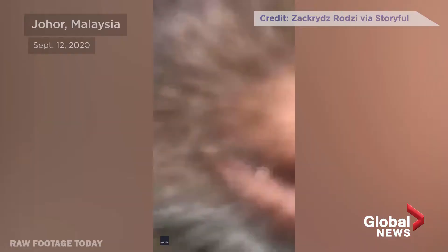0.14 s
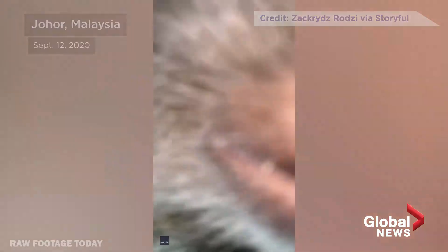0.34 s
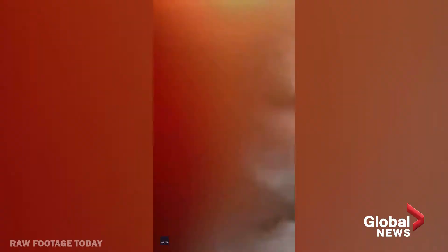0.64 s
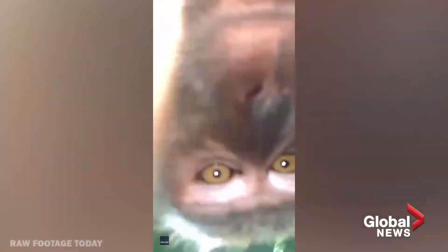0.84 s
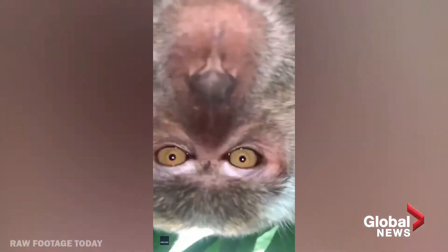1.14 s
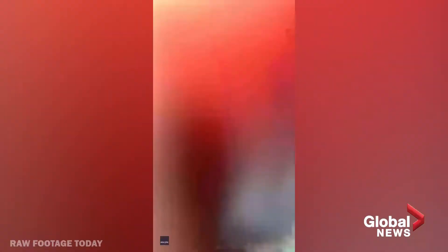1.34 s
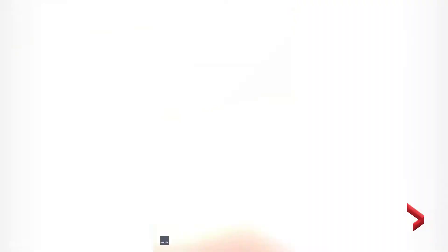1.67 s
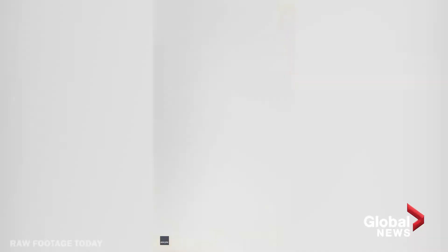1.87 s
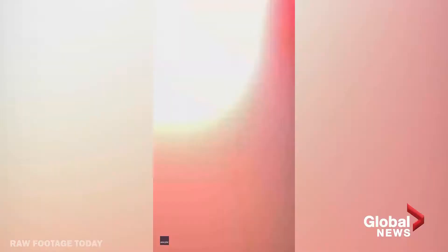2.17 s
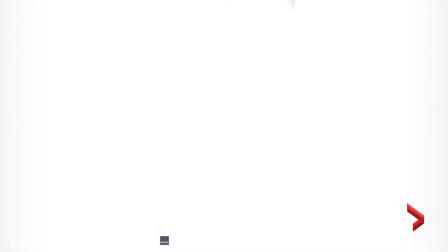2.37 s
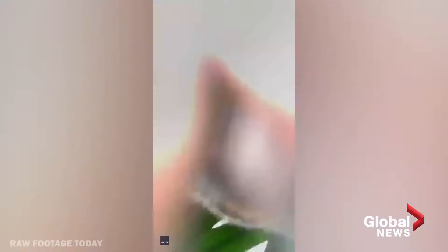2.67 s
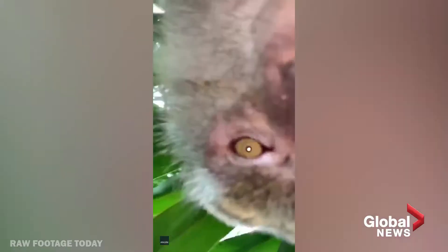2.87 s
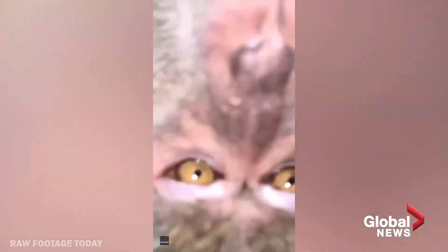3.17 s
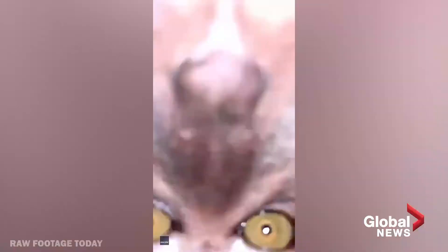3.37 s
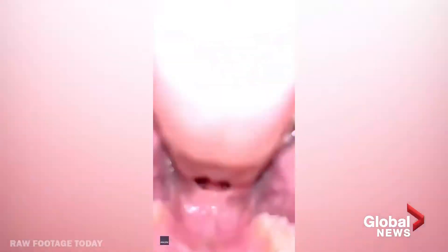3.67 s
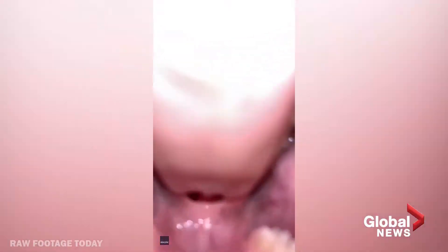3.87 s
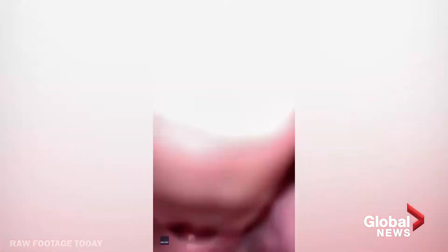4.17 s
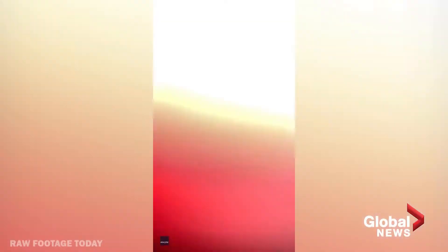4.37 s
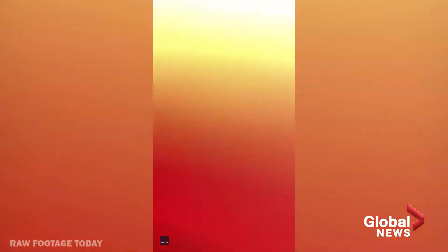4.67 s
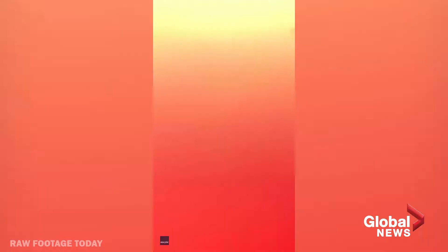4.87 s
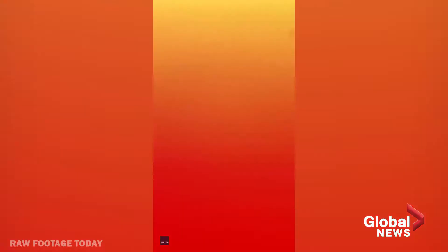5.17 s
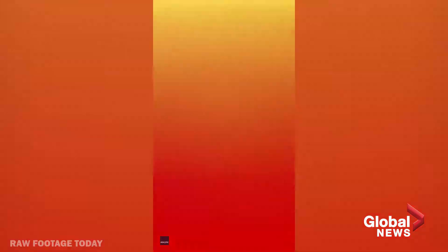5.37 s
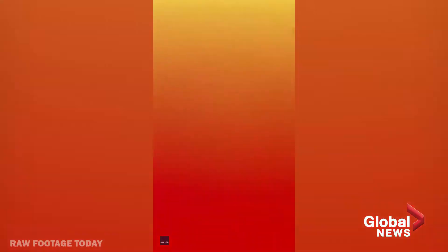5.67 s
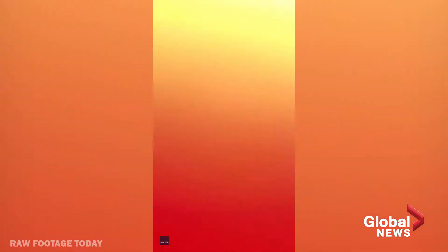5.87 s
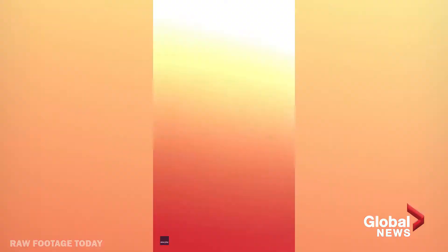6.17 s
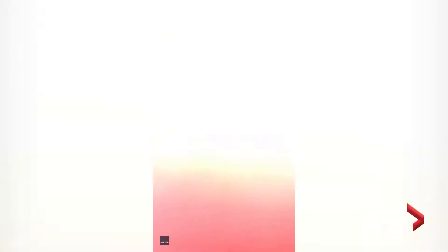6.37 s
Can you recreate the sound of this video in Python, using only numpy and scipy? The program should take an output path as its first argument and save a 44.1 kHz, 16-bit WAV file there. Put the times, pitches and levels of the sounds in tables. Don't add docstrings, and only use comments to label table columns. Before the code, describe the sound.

A monkey holds a phone outdoors, its microphones touched directly. A faint dove coos, then dull knocks near the start, a busy spell of thumps, fur rubbing and small squeaks, a quieter stretch with light tooth ticks, then sharp clicks and very loud booming bites, ending in sparse tiny wet ticks. Distant traffic and leaf hiss lie underneath.

```python
import sys
import numpy as np
from scipy import signal
from scipy.fft import rfft, irfft, next_fast_len
from scipy.io import wavfile
from scipy.ndimage import uniform_filter1d

SR = 44100
rng = np.random.default_rng(int(sys.argv[2]) if len(sys.argv) > 2 else 0)


def to_wav(sig):
    pcm = np.clip(np.atleast_2d(sig), -1, 1) * 32767
    pcm = np.round(pcm).astype(np.int16)
    wavfile.write(sys.argv[1], SR, pcm.T)


def level_to_linear(level):
    exponent = np.asarray(level, float) / 20
    return 10 ** exponent


N = 287393
SIZE = next_fast_len(N + SR // 2)
HZ = np.maximum(np.arange(SIZE // 2 + 1) * SR / SIZE, 1)
TIME = np.arange(N) / SR

# (frequency [Hz], level [dB per Hz])
CRACK_COLOUR = [(2200, -8.5), (3000, 15.5), (5000, 12.5), (9000, -29.5), (12000, -53), (12800, -39)]


def at_hz(points, hz=HZ):
    table_hz, values = np.array(points)[:, 0], np.array(points)[:, 1]
    return np.interp(np.log(hz), np.log(np.maximum(table_hz, 1)), values)


def in_time(rows):
    s, *columns = np.transpose(rows)
    return np.array([np.interp(TIME, s, c) for c in columns])


def drift(rate):
    r = np.exp(-80 * np.pi * rate / SR)
    white = rng.standard_normal(N // 40 + 2002)
    slow = signal.lfilter([1], [1, -2 * r, r * r], white)[2000:]
    return np.interp(np.arange(N) / 40, np.arange(len(slow)), slow / slow.std())


def noise(colour, patchy_db, patch_rate, grain_db, count):
    grains = rng.standard_normal((2, N)) * level_to_linear(grain_db * drift(800))
    spectrum = rfft(grains, SIZE) * level_to_linear(at_hz(colour))
    low_hz, high_hz = colour[0][0], colour[-1][0]
    place = (np.log(HZ / low_hz) / np.log(high_hz / low_hz)).clip(0, 1) * (count - 1)
    out = 0
    for k in range(count):
        crossfade = np.cos(np.pi / 2 * np.clip(place - k, -1, 1))
        band = irfft(spectrum * crossfade, SIZE)[:, :N]
        out = out + band * level_to_linear(patchy_db * drift(patch_rate))
    return out / out[0].std()


def blows(seconds, peak_db, colour, early_s=0.):
    # (frequency [Hz], delay [ms])
    low_lag = [(40, 39.2), (70, 29.5), (120, 16), (300, 7.5), (500, 5.5), (900, 4), (1500, 2.1),
               (3000, 0.92)]
    skirt_db_per_octave = 60
    cycles = np.cumsum(at_hz(low_lag) / 1000 - early_s) * SR / SIZE
    octaves_outside = np.abs(np.log2(HZ / HZ.clip(colour[0][0], colour[-1][0])))
    shape = level_to_linear(at_hz(colour) - skirt_db_per_octave * octaves_outside) * np.exp(-2j * np.pi * cycles)
    clicks = np.zeros(N)
    clicks[np.round(np.array(seconds) * SR).astype(int)] = level_to_linear(np.array(peak_db))
    return irfft(rfft(clicks, SIZE) * shape, SIZE)[:N] / np.abs(irfft(shape, SIZE)).max()


def garden():
    # (time [s], exposure of the ports [dB], fur brushing nearby [dB])
    hold = [(0, -53.5, -88), (.56, -51, -78), (.7, -51, -78), (1.05, -52, -76), (1.3, -52, -79.5),
            (1.62, -55.5, -66), (2.1, -50.5, -68), (2.65, -54.5, -76), (3.2, -54.5, -85.5),
            (3.7, -52, -73.5), (4.25, -53, -76), (4.57, -48.5, -64), (4.75, -56.5, -64.5),
            (5.25, -51.5, -67), (5.8, -54.5, -79.5), (6.2, -59.5, -80.5), (6.52, -57.5, -79.5)]
    # (time [s], level [dB])
    traffic = [(0, -47), (.8, -46.5), (1.3, -48.5), (1.7, -53.5), (2.3, -52), (2.9, -52.5), (3.4, -52),
               (3.7, -50), (5, -53.5), (5.75, -52), (6.1, -56), (6.52, -52)]
    # (from [s], to [s], treble [dB])
    background_dip = (5.265, 5.55, -21)
    # (frequency [Hz], level [dB per Hz])
    rumble_colour = [(25, -20), (45, -2), (70, -0.5), (150, -3), (260, -10), (330, -85)]
    rustle_colour = [(200, -34), (280, 4.5), (500, -1.5), (900, -4.5), (1300, -13.5), (2000, -13),
                     (2700, -14), (3200, -62)]
    insect_colour = [(2300, -16), (2900, 1), (3600, 3.5), (4500, -3), (6200, -8), (7500, 4), (8200, 4),
                     (8800, -32.5)]
    hiss_colour = [(7600, -45.5), (8400, -1.5), (9300, -5), (11000, -7.5), (11900, 2.5), (12400, -37.5)]
    rustle_db, hiss_db = -2.5, 3
    insects_db, insects_follow = -60.5, 0.31

    exposure_db, brushing_db = in_time(hold)
    start, end, dip_db = background_dip
    dip_db = dip_db * np.clip(np.minimum(TIME - start, end - TIME) / 0.016 + 1, 0, 1)
    rumble = level_to_linear(in_time(traffic)[0]) * noise(rumble_colour, 3.5, 8.6, 0, count=4)
    insect_gain = level_to_linear(insects_db + insects_follow * (brushing_db - brushing_db.mean()) + dip_db)
    rustle_gain = level_to_linear(exposure_db + rustle_db + 0.45 * dip_db)
    hiss_gain = level_to_linear(brushing_db + hiss_db + dip_db) + whiskers()
    rustle = rustle_gain * noise(rustle_colour, 0.53, 2.4, 3.3, count=6)
    insects = insect_gain * noise(insect_colour, 4.6, 3.7, 0.33, count=10)
    hiss = hiss_gain * noise(hiss_colour, 4.5, 7.0, 1.1, count=4)
    return rumble + rustle + insects + hiss


def dove():
    # (hoot start [s], hoot stretch [factor], roll start [s])
    calls = [
        (.18, 1.001, .591),
        (4.22, 1.07, 4.632),
    ]
    # (time from start [s], pitch [Hz], level [dB])
    hoot_track = [(0, 584, -54.5), (0.038, 634, -44.5), (0.05, 727, -46), (.064, 734, -44),
                  (.09, 731, -56.5), (0.168, 710, -40), (.2, 725, -55), (.27, 725, -56), (0.29, 715, -66)]
    # (time from first throb [s], pitch [Hz], held tone [dB], throb [dB])
    roll_track = [(-.03, 612, -93, -35.5), (0.021, 680, -59, -42), (.11, 707.8, -59.5, -44),
                  (0.257, 668, -58.5, -39), (0.39, 605, -52, -49.5), (.46, 569, -51.5, -88),
                  (0.551, 521, -60.5, -60)]
    throb_times = [0, .039, .071, .103, .131, .159, .188, .216, .242, .267, .291, .314, .338, .361, .38]
    throb_s, throb_rise_hz, throb_spread_db = 0.02, 32, 2

    out = np.zeros(N)
    for hoot_s, stretch, roll_s in calls:
        s = roll_s + np.array(throb_times)
        nearest = np.abs(TIME[::32, None] - s).argmin(axis=1).repeat(32)[:N]
        place = np.clip((TIME - s[nearest]) / throb_s, -.5, .5)
        throb_gain = level_to_linear(throb_spread_db * rng.standard_normal(len(s))[nearest])
        throb = throb_gain * np.cos(np.pi * place) ** 2
        slide_hz = throb_rise_hz * np.sin(2 * np.pi * place)
        hoot = [(hoot_s + stretch * t, hz, db, -120) for t, hz, db in hoot_track]
        roll = [(roll_s + t, *rest) for t, *rest in roll_track]
        for rows in hoot, roll:
            sounding = (TIME > rows[0][0]) & (TIME < rows[-1][0])
            flutter_db = 2.2 * drift(28)
            pitch_hz, held_db, throb_db = in_time(rows)
            phase = 2 * np.pi * np.cumsum(pitch_hz + slide_hz + 4.0 * drift(26)) / SR
            level = np.sqrt(2) * level_to_linear(held_db + flutter_db) + level_to_linear(throb_db) * throb
            out += sounding * level * np.sin(phase)
    return out


def knocks():
    # (time [s], peak [dB], low push, edge, crack [dB above peak])
    case_blows = [(0.6264, -9, -25, -42, -18.5), (0.995, -11.5, -6.5, -72, -31),
                  (1.022, -15.5, -10.5, -51, -47), (1.453, -13, 10.5, -29, -18),
                  (1.468, -7.5, 0, -4.5, -13), (1.736, -19, 1.5, -20, -21), (1.984, -30, -18, -35, -23),
                  (2.284, -17.5, 5.5, 9, -2), (2.343, -30.5, -10, -27, -42), (3.731, -30, 4, 8.5, -44),
                  (4.862, -32.5, -38, -33, -14.5), (5.208, -1, 1.5, -14, -40.5),
                  (5.2135, -8, -12.5, -12, -30), (5.219, -8.5, -3.5, -16, -39.5),
                  (5.233, -11, -3, -13.5, -41), (5.226, -4, 7, -25.5, -33), (5.246, -11.5, 9, -26, -26.5),
                  (5.436, -1, 5.5, -24, -75), (5.455, 4, 1.5, -14.5, -56), (5.475, -22, 17, -33, -30.5),
                  (5.482, -18, -4, -4, -19.5), (5.611, -5, -4.5, -11, -16), (5.625, -21.5, -4, -5.5, -11),
                  (5.655, -30.5, 3, -3.5, -22)]
    # (time [s], peak [dB])
    grip_pushes = [(0.327, -70), (1.577, -36), (1.737, -10), (1.766, -11.5), (1.998, -27.5), (2.119, -18),
                   (2.14, -18), (2.172, -24.5), (2.566, -26.5), (2.598, -26.5), (3.02, -50.5), (5.262, -2),
                   (5.285, -14), (5.387, -26), (5.502, -16.5)]
    # (frequency [Hz], level [dB per Hz])
    push_colour = [(25, -33.5), (55, -14), (100, -6), (200, -11), (320, -16.5), (450, -22)]
    grip_colour = [(30, -22), (50, -6), (75, 4), (120, 1.5), (190, -14), (280, -29.5)]
    case_colour = [(200, -36.5), (320, -6), (600, 4.5), (950, 3.5), (1300, -11.5), (1600, -74)]
    edge_colour = [(1100, -9.5), (1400, -6.5), (2000, -6), (2450, -25), (3200, -40), (5000, -52)]

    s, peak_db, push_db, edge_db, crack_db = np.transpose(case_blows)
    grip_s, grip_db = np.transpose(grip_pushes)
    s = s - .0012
    push = blows(s, peak_db + push_db - 7.0, push_colour)
    case = blows(s, peak_db - 6.5, case_colour)
    edge = blows(s, peak_db + edge_db + 4.0, edge_colour)
    crack = blows(s, peak_db + crack_db + 5.5, CRACK_COLOUR)
    return push + case + edge + crack + blows(grip_s, grip_db - 4.0, grip_colour, early_s=0.013)


def far_notes(wobble=0.018):
    # (start [s], length [s], pitch [Hz], level [dB])
    far_calls = [
        (0.848, 0.3, 5460, -59),
        (1.236, 0.15, 5870, -63),
        (1.398, 0.12, 649, -44),
        (3.22, 0.074, 5300, -59),
        (3.287, 0.12, 8300, -61.5),
        (3.294, 0.9, 462, -58.5),
        (3.82, 0.13, 8455, -56.5),
        (3.911, 0.027, 620, -44.5),
        (4.73, 0.12, 5840, -56),
    ]
    # (start [s],
    # length [s], pitch [Hz], level [dB])
    squeaks = [(.79, 0.026, 840, -50.5), (1.738, 0.035, 760, -31.5), (1.862, 0.017, 700, -40),
               (1.7, 0.013, 880, -38), (2.6, 0.021, 826, -40.5), (1.958, 0.011, 1080, -32.5),
               (1.985, .03, 757, -39), (2.136, 0.017, 700, -32), (2.405, 0.036, 977, -48.5),
               (2.74, .03, 800, -43), (.352, 0.025, 660, -45.5), (4.402, .022, 330, -48.5),
               (2.27, .008, 1278, -32), (2.277, 0.0092, 1400, -23), (2.77, .02, 1050, -40),
               (2.82, .025, 760, -46), (2.266, 0.011, 3950, -32), (1.728, .006, 7000, -27)]
    out, waver, flicker_db = np.zeros(N), drift(52), 1.2 * drift(40)
    for s, length, hz, level_db in far_calls + squeaks:
        near = slice(round(s * SR), round((s + length) * SR))
        swell = np.sin(np.pi * np.clip((TIME[near] - s) / length, 0, 1)) ** .5
        phase = 2 * np.pi * hz * np.cumsum(1 + wobble * waver[near]) / SR
        out[near] += level_to_linear(level_db + flicker_db[near]) * swell * np.sin(phase)
    return out


def rubbing(edge_share=0.72, pressure_lag_s=0.0038):
    # (start [s], length [s], pressure [dB], scrub [dB], fur hiss [dB])
    fur_strokes = [(0.993, 0.055, -25, -39.5, -58), (1.446, 0.041, -22.5, -26, -27.5),
                   (1.46, 0.027, -18.5, -22.5, -19), (1.509, 0.16, -37, -45, -50),
                   (1.688, 0.069, -41, -38.5, -31.5), (1.733, 0.048, -44, -35, -33.5),
                   (1.866, 0.089, -49, -44.5, -60.5), (1.959, 0.068, -29.5, -42.5, -64),
                   (2.054, 0.059, -47, -46.5, -40.5), (2.086, 0.086, -32, -37.5, -30.5),
                   (2.175, 0.041, -24.5, -46, -48.5), (2.284, 0.0092, -30, -13, -11.5),
                   (2.287, 0.035, -31, -41, -83.5), (2.34, 0.11, -48, -50, -89),
                   (2.521, 0.062, -61, -42.5, -40), (2.557, 0.082, -30.5, -46.5, -45.5),
                   (2.704, 0.18, -53.5, -47.5, -54), (2.952, 0.22, -49, -54, -66.5),
                   (4.495, 0.17, -43, -49, -48.5), (5.004, 0.047, -71.5, -59, -46),
                   (5.473, 0.016, -51, -42, -39), (5.64, 0.069, -43, -46, -39),
                   (5.927, 0.051, -53, -64, -47)]
    # (start [s], length [s], pressure [dB], scrub [dB], scratch [dB])
    claw_strokes = [(0.612, 0.031, -28.5, -37.5, -30.5), (1.472, 0.032, -36, -37.5, -31.5),
                    (1.848, 0.04, -70, -53, -57.5), (1.958, 0.071, -60.5, -50, -46),
                    (2.107, 0.056, -55, -41, -45.5), (2.436, 0.076, -50, -67.5, -57.5),
                    (4.682, 0.33, -59.5, -64, -60), (2.25, 0.054, -51.5, -39.5, -34),
                    (3.573, 0.12, -54, -60, -57.5), (3.74, 0.16, -51, -56, -49.5),
                    (4.2, 0.12, -56.5, -52.5, -52), (5.204, 0.032, -20.5, -13.5, -25),
                    (5.231, 0.047, -9.5, -33, -47.5), (5.386, 0.078, -17.5, -77.5, -69),
                    (5.428, 0.079, -24.5, -24.5, -33), (5.492, 0.047, -26.5, -46, -51),
                    (5.571, 0.03, -50, -57, -52), (5.6, 0.032, -55, -35, -38)]
    # (frequency [Hz], level [dB per Hz])
    pressure_colour = [(25, -14.5), (50, 20.5), (90, 15.5), (160, -5.5), (260, -1.5), (340, -59.5)]
    scrub_colour = [(200, -5.5), (290, -3), (450, -7), (750, -3.5), (900, -7), (1050, 0.5), (1350, -14),
                    (1600, -39)]
    scratch_colour = [(1100, -14.5), (1400, 0), (2000, 2), (2600, -7.5), (7000, -24.5), (11800, -40.5),
                      (12500, -62.5)]
    fur_colour = [(2200, -7), (3000, -10), (4000, -4), (5500, 1.5), (7500, -4), (12000, -2.5), (12550, -18),
                  (12900, -60.5)]
    fur_scratch_slope, fur_scratch_db = 1.28, -1
    claw_hiss_db = -20

    gains = np.zeros((4, N))
    fur = [(*row, fur_scratch_slope * hiss_db + fur_scratch_db, hiss_db) for *row, hiss_db in fur_strokes]
    claws = [(*row, row[-1] + claw_hiss_db) for row in claw_strokes]
    for s, length, *levels_db in fur + claws:
        near = slice(round((s - length) * SR), round((s + 2 * length) * SR))
        place = (TIME[near] - s) / length
        inside = np.clip(np.minimum(place, 1 - place) / edge_share + 0.35, 0, 1)
        swell = np.sin(np.pi / 2 * inside) ** 2
        gains[:, near] += level_to_linear(np.array(levels_db))[:, None] * swell
    pressure_gain = np.interp(TIME - pressure_lag_s, TIME, gains[0])
    pressure = pressure_gain * noise(pressure_colour, 1.5, 5.0, 0, count=3)
    scrub = gains[1] * noise(scrub_colour, 2.6, 22.0, 0.99, count=6)
    scratch = gains[2] * noise(scratch_colour, 5.0, 27.0, 7.3, count=6)
    hiss = gains[3] * noise(fur_colour, 2.5, 40.0, 3.0, count=6)
    return pressure + scrub + scratch + hiss


def jerks():
    # (time [s], peak [dB], top frequency [Hz])
    slips = [(5.2115, -21, 4700), (5.22, -30, 4500), (5.2274, -34, 4600), (5.2351, -19, 4600),
             (5.2445, -29, 4660), (5.254, -39, 4430), (5.309, -45.5, 2600), (5.43, -41, 8430),
             (5.4385, -35.5, 5080), (5.472, -19, 9000), (5.4815, -27, 8500), (5.485, -18, 8350),
             (5.493, -24, 8400), (5.5, -35, 8000), (5.56, -33, 2500), (5.594, -42, 8000),
             (5.607, -43, 7000), (5.625, -23, 5900), (0.614, -29.5, 5500), (0.619, -34, 4000),
             (0.6235, -14, 4040), (0.6262, -18, 3850), (2.2035, -30, 12370), (2.2665, -24, 5000),
             (2.2695, -22, 5000), (2.272, -27, 5000), (1.986, -27, 2000), (1.868, -35, 1810),
             (1.902, -38, 1800), (2.545, -34, 4700), (2.562, -33, 4700), (2.585, -34, 4700),
             (5.4225, -41.5, 8000), (2.2045, -22.5, 15040), (2.219, -34.5, 14500), (2.285, -12, 7980),
             (2.288, -12.5, 7980), (5.456, -13, 16300), (5.613, -21, 15470), (5.655, -25.5, 15000),
             (5.716, -19.5, 16300), (2.413, -40, 12000), (0.6255, -18, 3500), (2.444, -34, 12000),
             (2.457, -37, 5000)]
    decay_s, from_hz = .0007, 1000
    out, t = np.zeros((2, N + 400)), np.arange(400) / SR
    bursts = rng.standard_normal((60, 2, 400)) * np.exp(-t / decay_s)
    for (s, peak_db, top_hz), burst in zip(slips, bursts):
        band = signal.butter(3, [from_hz, top_hz], "band", fs=SR, output="sos")
        click = signal.sosfilt(band, burst)
        start = round(s * SR)
        out[:, start:start + 400] += level_to_linear(peak_db) * click / np.abs(click[0]).max()
    return out[:, :N]


def ticks(t60=.004, burst_s=.0006, width_hz=4000):
    # (time [s], peak [dB], ring [Hz])
    taps = [(0.6145, -40, 5740), (1.4441, -45, 6480), (2.219, -40, 6880), (2.444, -46, 7440),
            (2.457, -31.5, 9060), (3.515, -35, 8950), (3.8109, -33, 9800), (3.86, -32.5, 9590),
            (3.964, -36.5, 10900), (4.1077, -37.5, 9870), (4.148, -35.5, 9480), (4.517, -40, 9740),
            (4.5553, -21, 8730), (4.9116, -34.5, 10770), (5.002, -27, 11200), (5.0205, -16, 10700),
            (5.455, -12.5, 5860), (5.5654, -35, 6840), (5.6112, -21, 6200), (5.7052, -50, 9570),
            (5.8408, -27, 11250), (6.259, -35, 11370), (6.4144, -21.5, 10700)]
    nicks = [(2.2054, -19.5, 6050), (3.5668, -39, 10700), (3.6706, -15.5, 11270), (3.691, -34, 7690),
             (4.6775, -17, 10400), (4.7104, -8.5, 10800), (4.7466, -25, 9760), (4.764, -27.5, 11300),
             (4.827, -21.5, 11000), (4.9175, -33.5, 10760), (5.0336, -30, 9100), (5.6525, -24, 8900),
             (5.655, -15, 6760), (5.6746, -19, 10900), (5.69, -26.5, 11070), (5.7154, -12.5, 9900),
             (5.963, -28, 11250), (6.123, -32.5, 11180), (6.231, -39, 10870), (6.4834, -23, 12750),
             (5.0228, -27, 11100), (2.2042, -19.5, 10500)]
    wet = [(1.559, -34, 8000), (1.615, -49, 8000), (2.413, -44, 8500), (4.683, -28, 11000),
           (4.843, -48, 11500), (5.618, -36, 9500), (5.638, -29, 8000), (5.646, -40, 8050),
           (5.682, -22, 10400), (5.758, -39, 10900), (5.775, -42, 11000), (5.834, -41.5, 11500),
           (5.911, -39, 10700), (5.933, -44, 11100), (5.955, -34, 6960), (5.981, -43.5, 11000),
           (6.023, -39, 11040), (6.039, -42, 10500), (6.062, -47, 11000), (6.095, -47.5, 10920),
           (6.272, -35.5, 10940), (6.452, -39, 11050), (6.473, -36, 9700)]
    tap_body_db, nick_body_db, snap_db = -18, -40, -14

    out, t = np.zeros((2, N + 400)), np.arange(400) / SR
    slips = rng.standard_normal((90, 2, 400)) * np.exp(-t / burst_s)
    wide = signal.butter(2, [7500, 13800], "band", fs=SR, output="sos")
    for (s, peak_db, hz), slip in zip(taps + nicks + wet, slips):
        edges_hz = [hz - width_hz / 2, min(hz + width_hz / 2, 12300)]
        band = signal.butter(2, edges_hz, "band", fs=SR, output="sos")
        ring = signal.sosfilt(band, slip) + .25 * np.sin(2 * np.pi * hz * t) * level_to_linear(-60 * t / t60)
        ring += level_to_linear(snap_db) * signal.sosfilt(wide, slip)
        start = round(s * SR)
        out[:, start:start + 400] += level_to_linear(peak_db) * ring / np.abs(ring[0]).max()
    tap_s, tap_db, _ = np.transpose(taps)
    nick_s, nick_db, _ = np.transpose(nicks)
    body_db = np.r_[tap_db + tap_body_db, nick_db + nick_body_db]
    return out[:, :N] + blows(np.r_[tap_s, nick_s], body_db, CRACK_COLOUR)


def whiskers():
    # (start [s], length [s], level [dB])
    brushes = [(0.633, 0.21, -60), (0.795, 0.38, -59.5), (1.522, 0.08, -42), (1.84, 0.19, -45),
               (2.324, 0.11, -56.5), (2.519, .09, -32.5), (2.714, 0.14, -49.5), (2.961, 0.17, -66.5),
               (3.462, .12, -65), (3.596, 0.28, -63), (3.933, 0.092, -63), (4.07, 0.1, -63.5),
               (4.2, 0.26, -64), (2.163, 0.13, -55.5), (5.75, 0.16, -62), (6.05, 0.48, -65.5),
               (4.78, .2, -61), (5.64, .07, -49), (4.392, 0.13, -53), (4.67, 0.15, -57),
               (5.0, 0.076, -47.5), (5.187, 0.029, -32.5), (5.923, 0.096, -58)]
    gain = np.zeros(N)
    for s, length, db in brushes:
        near = slice(round(s * SR), round((s + length) * SR))
        gain[near] += level_to_linear(db) * np.sin(np.pi * np.clip((TIME[near] - s) / length, 0, 1))
    return gain


def ports(left, other):
    # (frequency [Hz], phase by which left leads [rad])
    port_phase = [(1100, 0), (1800, -.7), (2400, -3), (3500, -1.5), (5200, -3.1), (7400, -6.3),
                  (11000, -12.3), (12300, -12.7)]
    # (frequency [Hz], level [dB])
    port_level = [(720, 0), (860, -6), (1200, -8), (1500, -5), (2300, -8), (2900, -1), (6000, 0)]
    # (frequency [Hz], share [0-1])
    own_share = [(700, 0), (900, .55), (3000, .45), (6500, .32)]
    share = at_hz(own_share)
    turn = level_to_linear(at_hz(port_level)) * np.exp(-1j * np.interp(HZ, *np.transpose(port_phase)))
    heard = np.sqrt(1 - share) * rfft(left, SIZE) + np.sqrt(share) * rfft(other, SIZE)
    return np.array([left, irfft(turn * heard, SIZE)[:N]])


def scene():
    handling = rubbing() + ticks() + jerks() + knocks() * [[1], [.4]]
    left, other = garden() + handling + dove() + far_notes()
    return ports(left, other)


def starved_bands(x, size=1024, count=4):
    # sum, difference [dB]
    drop_below_db = [-2, -11.5]
    floor_db, wander_spread_db, from_hz = -97, 3.5, 1300
    attack_db, loud_db = 3, -19
    thin_to_hz, thin_sum_db = 2750, 21.5
    relief_from_db, relief_slope = -36, .55

    hz, _, cells = signal.stft([x[0] + x[1], x[0] - x[1]], SR, nperseg=size)
    power = np.abs(cells[:, :-1]) ** 2
    bands = power.reshape(2, -1, count, power.shape[-1]).mean(axis=2)
    bands_db = 10 * np.log10(uniform_filter1d(bands, size=3, axis=2) + 1e-20)
    wander = uniform_filter1d(rng.standard_normal(bands.shape), size=15, axis=2)
    wander = uniform_filter1d(wander, size=3, axis=1)
    wander_db = wander_spread_db * wander / wander.std()
    treble_db = 10 * np.log10(power[:, hz[:-1] > from_hz].sum(axis=(0, 1)) + 1e-20)
    relief_db = relief_slope * np.maximum(treble_db - relief_from_db, 0)
    limit_db = bands_db[::-1] + np.array(drop_below_db)[:, None, None] + wander_db - relief_db
    weak = bands_db < limit_db
    thin_db = thin_sum_db * (hz[:-1:count, None] < thin_to_hz) * [[[1]], [[0]]]
    weak |= bands_db < floor_db + thin_db + wander_db
    attack = treble_db - signal.medfilt(treble_db, kernel_size=5) > attack_db
    whole_db = 10 * np.log10(power.sum(axis=(0, 1)) + 1e-20)
    weak &= ~(attack | (whole_db > loud_db + 12) | (treble_db > loud_db))
    cells[:, :-1] *= 1 - weak.repeat(count, axis=1) * (hz[:-1, None] > from_hz)
    total, apart = signal.istft(cells, SR, nperseg=size)[1][:, :N]
    return np.array([total + apart, total - apart]) / 2


def band_limit(x):
    return signal.sosfilt(signal.butter(12, 16300, fs=SR, output="sos"), x)


def record(dry):
    top_hz, leak_db = 12800, -25
    cut = signal.cheby2(10, 50, top_hz, fs=SR, output="sos")
    leak = signal.butter(4, top_hz, "high", fs=SR, output="sos")
    rounded = dry / (1 + (dry / .91) ** 6) ** (1 / 6)
    kept = starved_bands(signal.sosfilt(cut, rounded) + level_to_linear(leak_db) * signal.sosfilt(leak, dry))
    return band_limit(kept)


dry = scene()
out = record(dry)
to_wav(out)
```